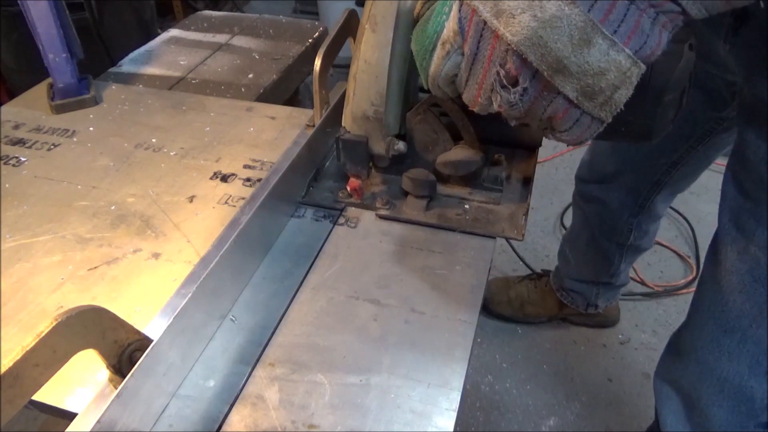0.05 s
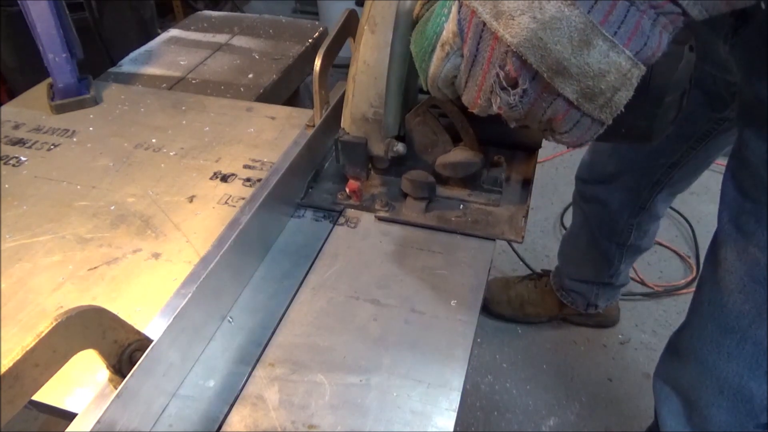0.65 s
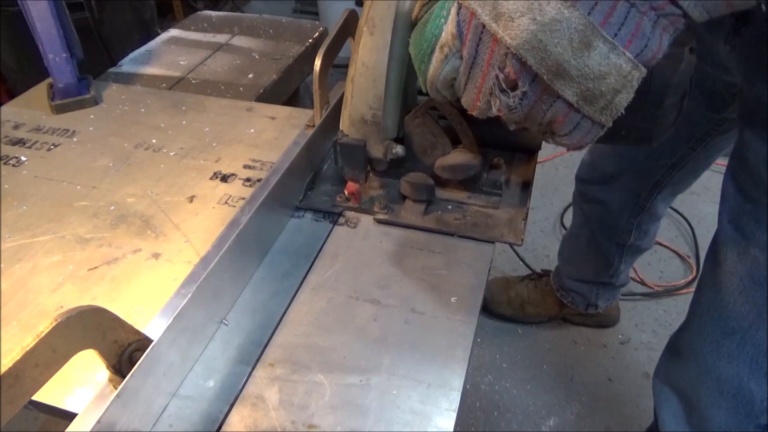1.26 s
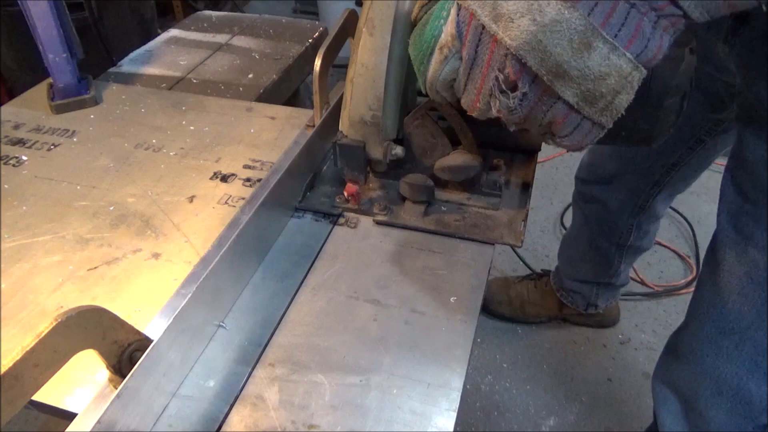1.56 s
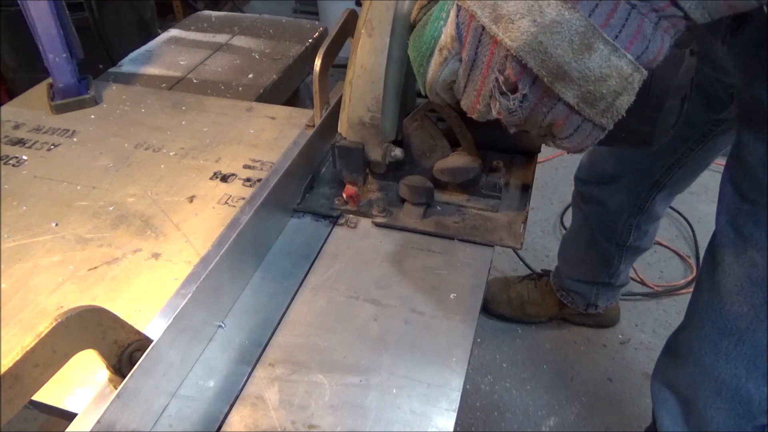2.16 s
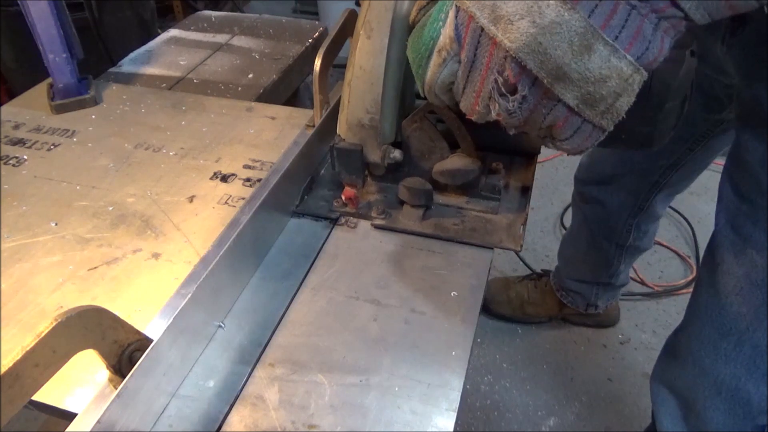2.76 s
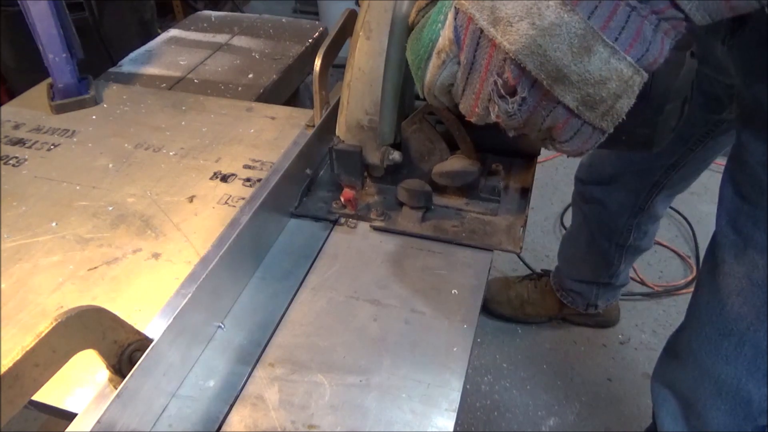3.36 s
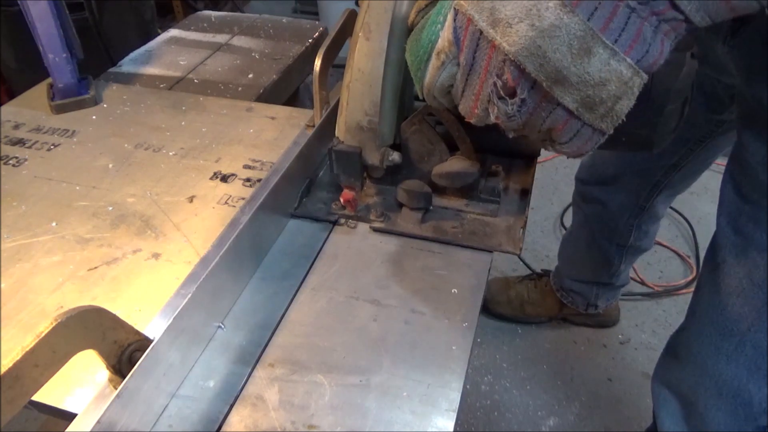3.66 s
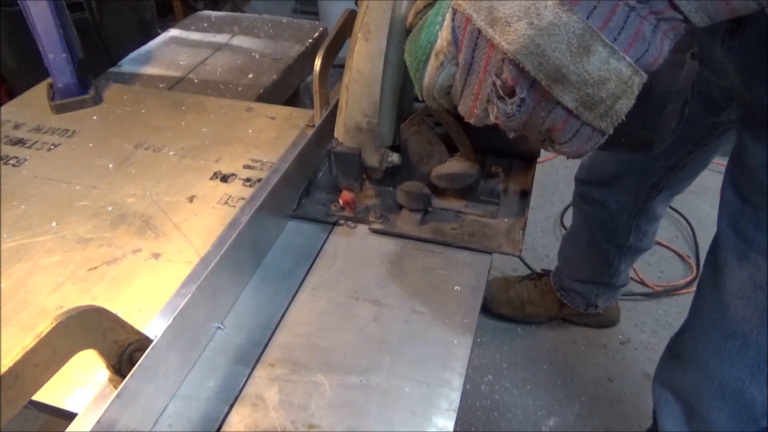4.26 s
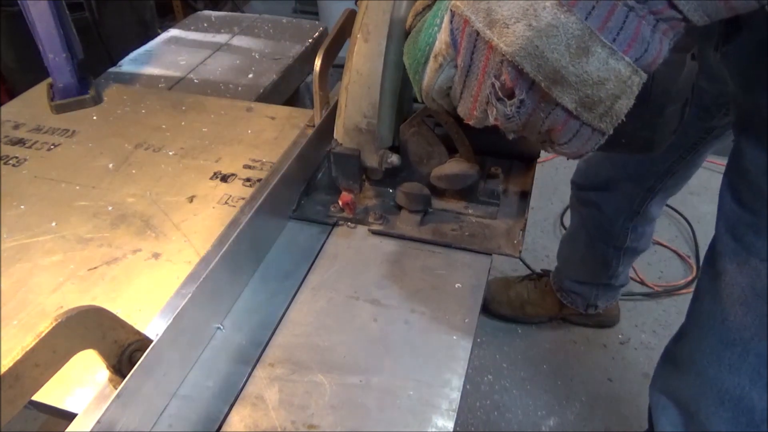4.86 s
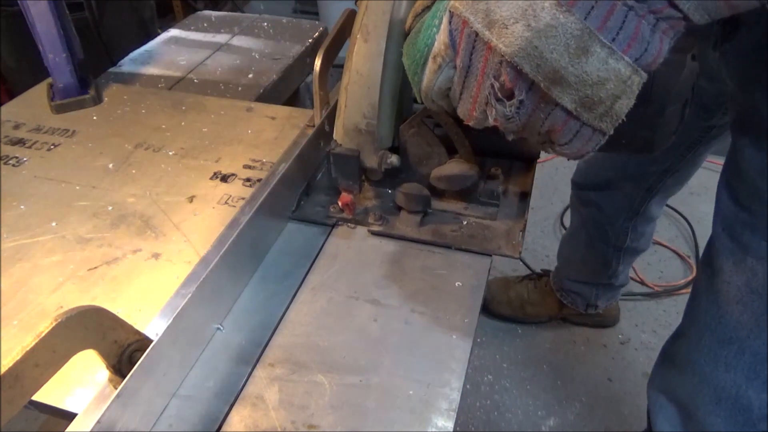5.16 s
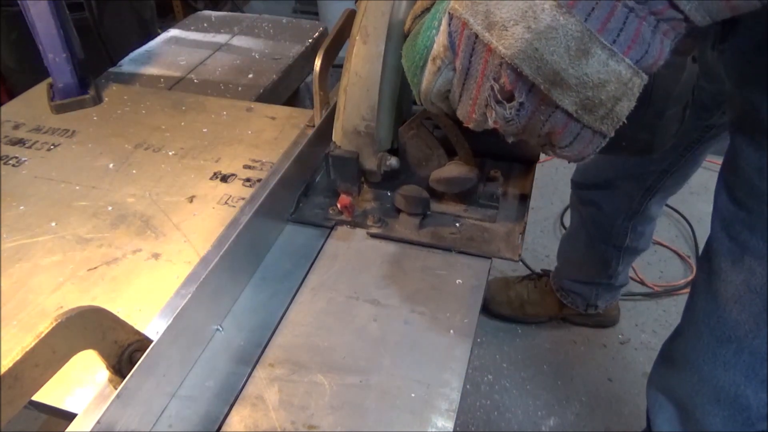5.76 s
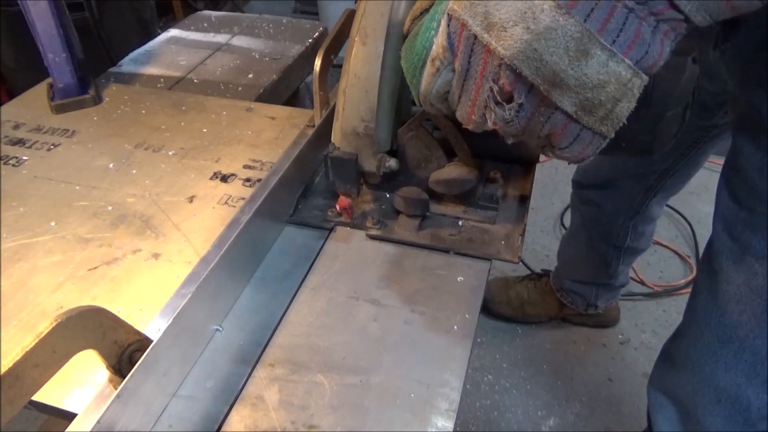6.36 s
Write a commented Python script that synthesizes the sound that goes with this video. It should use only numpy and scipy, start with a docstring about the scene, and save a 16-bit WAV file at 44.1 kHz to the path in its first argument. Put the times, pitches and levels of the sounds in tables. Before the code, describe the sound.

Already deep in a cut, a circular saw screeches without pause through a thick metal plate. The shrill, hissing ring wavers as the pressure changes, with early squeals from the rubbing blade and a low motor whine beneath. Past the middle it eases for a moment, with a dull knock on either side, then bites again. The microphone is near and a little overdriven, in a workshop with very short reflections.

```python
"""A hand-held circular saw cuts along a thick aluminium plate in a workshop.
Carbide teeth tear off chips; the force sets blade, plate and saw body ringing in a dense screech,
with the tooth rate humming below. The hand leans in and eases off a few times. The blade's flank
rubs the kerf: an early squeal gives way to pairs of sharp rings that swell as the blade binds.
Late in the cut, the saw's shoe knocks twice on the plate."""
import sys
import numpy as np
from scipy import signal
from scipy.fft import rfft, irfft, next_fast_len
from scipy.io import wavfile

SR = 44100
rng = np.random.default_rng(int(sys.argv[2]) if len(sys.argv) > 2 else 0)


def wrap_up_sound(samples):
    """Save the sound to the file named by the first command line argument, as 16-bit audio."""
    columns = np.atleast_2d(samples).T
    # keep every value between -1 and 1, then stretch to whole-number steps
    tamed = np.clip(columns, -1, 1)
    steps = np.round(tamed * 32767).astype(np.int16)
    wavfile.write(sys.argv[1], SR, steps)


N = 287532

# Blade speed, sagging under strain. Each row: time in seconds, turns per second.
BLADE_SPEED = [(0, 63.3), (.4, 64.0), (1.0, 63.0), (1.25, 63.0), (1.58, 62.0), (1.8, 63.3), (2.4, 63.5),
               (2.7, 62.9), (3.0, 63.2), (3.3, 63.95), (3.95, 63.45), (4.4, 64.45), (4.8, 63.1),
               (5.25, 64.1), (5.6, 63.8), (6.52, 63.8)]
# The hand leans in (+) or eases off (-). Each row: start and end in seconds, bite of the teeth in dB,
# strain on the saw body in dB. Layers follow these by their own shares.
FEED_CHANGES = [(1.22, 1.44, 0.8, 4.5), (1.54, 1.79, -3, 2), (1.79, 2.31, -1.0, 0), (2.54, 2.63, -2, 1.5),
                (2.66, 2.81, 1.1, 5), (2.85, 2.94, -3.8, 0.5), (3.96, 4.06, -0.5, 0.5),
                (4.43, 4.62, 0.6, -.5), (4.64, 4.91, -5, -1.5), (4.91, 5.13, -.5, -1),
                (5.13, 5.35, -2.5, -1), (5.37, 5.49, 1.6, -2), (5.55, 5.63, -1.4, -1)]
# Resonances of blade, plate and saw body; the narrow lowest body row sits on the drive whine's 19th spindle
# tone rather than a body mode of its own. Each row: pitch in Hz, width in Hz, relative level in dB.
BLADE_MODES = [(5700.0, 77.0, -10.1), (5762.0, 24.0, -10.5), (6098.0, 19.0, -5.5), (6235.0, 41.0, -7.0),
               (6405.0, 27.0, -5.7), (6512.0, 32.0, -3.8), (6606.0, 55.0, -2.1), (6729.0, 24.0, -7.0),
               (6919.0, 37.0, -3.1), (7020.0, 35.0, -3.6), (7106.0, 33.0, -1.2), (7217.0, 17.0, -12.8),
               (7331.0, 45.0, -7.1), (7471.0, 70.0, -1.3), (7610.0, 38.0, -2.3), (7688.0, 39.0, -8.0),
               (7929.0, 174.0, -2.5), (8045.0, 35.0, -5.8), (8600.0, 86.0, -0.9), (8771.0, 56.0, -3.6),
               (9118.0, 99.0, -5.3), (9214.0, 27.0, -6.1), (9358.0, 74.0, 0.0), (9520.0, 29.0, -5.9),
               (9807.0, 25.0, -11.1), (9894.0, 41.0, -10.7), (9974.0, 69.0, -2.0), (10112.0, 31.0, -3.7),
               (10406.0, 29.0, -16.4), (10784.0, 124.0, -6.0)]
PLATE_MODES = [(2233.0, 67.0, -4.9), (2498.0, 40.0, -10.4), (3765, 28, -4), (3903.0, 18.0, -11.7),
               (3983.0, 55.0, 0.0), (4136.0, 29.0, -6.1), (4273.0, 23.0, -10.7), (4474.0, 44.0, -5.6),
               (4536.0, 15.0, -6.8), (4694.0, 46.0, -1.7), (4793.0, 20.0, -3.2), (5350.0, 32.0, -4.3),
               (5443.0, 17.0, -5.5)]
BODY_MODES = [(1206.0, 12.0, -7.8), (1290.0, 28.0, -5.2), (1384.0, 34.0, -3.8), (1421.0, 38.0, 0.0),
              (1586.0, 21.0, -16.8)]
# Colour of the hiss and the low rumble. Each row: frequency in Hz, relative level in dB.
HISS_SPECTRUM = [(700, -27), (1000, -12), (1400, -11), (2200, -11), (3100, -8), (4500, -13.5), (5800, -6.5),
                 (7200, -20), (8400, -10), (10400, -2.5), (11000, -4)]
RUMBLE_SPECTRUM = [(20, -13.5), (40, -10), (70, -7), (150, -0.5), (400, 2), (750, 4), (1100, 3),
                   (2000, -13)]
# Tones locked to the spindle. Each row: multiple of the blade speed, relative level in dB.
TOOTH_ORDERS = [(12, 3.5), (13, -4.5), (9, -8.5)]
DRIVE_ORDERS = [(15, -12.5), (16, -10), (19, -5.5), (20, -14), (22.0, -9), (24, -7), (25, -13)]
# Swells of the tooth hum. Each row: time in seconds, relative level in dB.
TOOTH_HUM_CURVE = [(0, -50), (.25, -38), (.5, -37), (1.0, -47), (1.75, -55), (2.15, -44.5), (2.5, -47),
                   (3.1, -48), (3.22, -34.5), (3.55, -36.5), (3.8, -42), (4.45, -32.5), (4.75, -46),
                   (5.25, -51), (5.7, -35.5), (6.52, -35)]
# Resonances that squeal. Each row: pitch in Hz, width in Hz, relative level in dB.
LOW_SQUEAL_MODES = [(1735, 9.1, -6.5), (1980, 27, 5.5)]
HIGH_SQUEAL_MODES = [(4908, 38, 8), (4980, 18, -1)]
# Squeals. Each row: start and end in seconds, boost of the low squeal in dB, of the high one in dB.
SQUEALS = [(0.06, 0.76, 5.5, 7), (0.80, 1.60, 6, 4.5), (1.95, 2.90, 4, 1), (4.82, 5.17, 3, -5),
           (5.35, 5.57, 4.5, 2)]
# The blade's paired rings. Each row: pitch in Hz, relative starting level in dB,
# change in dB per second, share of the binding swell.
LOWER_PAIRS = [(2358, -40.5, 1.5, 1.3), (2418, -40.5, 1.6, 1.3), (2740, -38.5, 1.8, 1),
               (2803, -38.5, 1.9, 1), (3262, -35, .7, .7), (3311, -36.5, 1.1, .9)]
HIGHEST_PAIR = [(3769, -31.5, -.3, 1), (3823, -35, .6, .7)]
# The blade binds. Each row: start and end in seconds, swell of the lower pairs and the highest in dB.
BINDS = [(1.05, 1.48, 0, 5.5), (2.30, 2.854, -1, 6.5), (3.42, 3.68, 1.5, 5), (4.127, 4.286, 4.5, 4),
         (4.38, 4.604, 1.5, 3), (5.74, 6.053, 3, 7), (6.047, 6.42, 4, 3)]
# The shoe hits the plate. Each row: time in seconds, relative level in dB.
KNOCKS = [(4.439, -24), (5.389, -17)]
# Colour of the workshop's reverb. Each row: frequency in Hz, level against the direct sound in dB.
REVERB_SPECTRUM = [(60, -35), (110, -28), (190, 0), (350, 1.5), (620, 3), (1120, -8), (2010, -6.5),
                   (3610, -8), (6480, -11.5), (11600, -18)]

# Each voice: relative level in dB at steady feed, dB per dB of bite, change in dB per second.
TOP_SCREECH, LOWER_SCREECH = (-15.5, 1.27, 0.062), (-18, 1.08, -0.24)
PLATE_RING, BODY_GROWL = (-19.5, 1, 0.11), (-23.5, 0.23, -0.21)
DRIVE_WHINE, LOW_RUMBLE = (-37, 0.108, 0), (-35, 2.4, .03)
FEED_RAMP_S = 0.056   # time the hand takes to change its pressure


def from_db(db):
    """Decibels to gain."""
    return 10 ** (np.asarray(db) / 20)


def rms_one(x):
    """Scale to an rms of 1."""
    return x / np.sqrt(np.mean(x ** 2) + 1e-20)


def curve(rows):
    """Glide in straight lines through (seconds, value) points."""
    return np.interp(np.arange(N) / SR, *np.transpose(rows))


def gate(start_s, end_s, ramp_s):
    """Fade in, hold at 1 and fade out, the fades centred on start and end."""
    t = np.arange(N) / SR
    return np.clip((t - start_s) / ramp_s + .5, 0, 1) - np.clip((t - end_s) / ramp_s + .5, 0, 1)


def held(rows, ramp_s):
    """Gate each (start, end, values) row; one signal for each value column."""
    return sum(np.outer(values, gate(start, end, ramp_s)) for start, end, *values in rows)


def level(voice, bite_db):
    """A voice's level in dB follows the bite and shifts as the cut advances."""
    steady_db, follows, db_per_s = voice
    return steady_db + follows * bite_db + db_per_s * np.arange(N) / SR


def coloured(x, spectrum):
    """Equalise with a smooth (Hz, dB) curve."""
    hz, db = np.transpose(spectrum)
    size = next_fast_len(N + SR // 2)
    bins = np.maximum(np.fft.rfftfreq(size, 1 / SR), 1)
    gain = from_db(np.interp(np.log(bins), np.log(hz), db))
    return irfft(rfft(x, size) * gain, size)[:N]


def drift(rate_hz):
    """A random wobble of rms 1, mostly slower than the given rate."""
    hop = 40   # samples between random points
    pole = np.exp(-2 * np.pi * rate_hz * hop / SR)
    noise = rng.standard_normal(N // hop + 2002)
    slow = signal.lfilter([1], [1, -2 * pole, pole * pole], noise)[2000:]
    return np.interp(np.arange(N) / hop, np.arange(len(slow)), rms_one(slow))


def ringing(modes, force, friction):
    """Each mode is shaken by its own random share of the force; friction limits its swing. Rms 1."""
    out, run_in = np.zeros(N), SR // 10
    force = np.pad(force, (run_in, 0), "reflect")
    for hz, width_hz, db in modes:
        pole = np.exp((2j * np.pi * hz - np.pi * width_hz) / SR)
        shaking = force * rng.uniform(-1.03, 1, len(force))
        swing = signal.lfilter([1], [1, -pole], shaking)[run_in:]
        energy = np.abs(swing) ** 2
        out += from_db(db) * rms_one(swing.real / np.sqrt(1 + friction * energy / energy.mean()))
    return rms_one(out)


def spindle_tones(turns, orders, waver_db):
    """Wavering tones at multiples of the blade speed."""
    phase = 2 * np.pi * (turns + 0.0026 * drift(6))
    return np.sqrt(2) * sum(from_db(db + waver_db * drift(2.4)) * np.sin(k * phase) for k, db in orders)


def cutting_force(turns, teeth, tooth_depth, runout_depth):
    """Each tooth bites once a turn, deeper on the high side of the blade."""
    bites = np.cos(2 * np.pi * teeth * turns)
    runout = np.cos(2 * np.pi * turns)
    return rms_one(np.exp(tooth_depth * bites + runout_depth * runout))


def screech(force, bite_db, split_hz=7300):
    """Blade and plate ring over the hiss of tearing chips; the blade flutters as the teeth grab."""
    top_db, plate_db = level(TOP_SCREECH, bite_db), level(PLATE_RING, bite_db)
    top = ringing([m for m in BLADE_MODES if m[0] > split_hz], force, friction=0.034)
    lower = ringing([m for m in BLADE_MODES if m[0] <= split_hz], force, friction=.1)
    top *= from_db(top_db - 1.0 + drift(38))
    lower *= from_db(level(LOWER_SCREECH, bite_db) - 0.5 + 1.3645 * drift(29))
    plate = from_db(plate_db - 2.5) * ringing(PLATE_MODES, force, friction=0.02233)
    hiss = rms_one(coloured(force * rng.standard_normal(N), HISS_SPECTRUM))
    return top + lower + plate + from_db((top_db + plate_db) / 2 + 2.5) * hiss


def body_growl(turns, force, bite_db, strain_db):
    """The saw's body rings, shaken once a turn by the blade's run-out."""
    db = level(BODY_GROWL, bite_db) - 1.13 + 0.77 * strain_db + drift(22)
    throb = rms_one(np.exp(0.28 * np.cos(2 * np.pi * turns + 1.73 * drift(5.3))))
    return from_db(db) * throb * ringing(BODY_MODES, force, friction=0.18)


def tooth_hum(turns, bite_db):
    """The passing teeth hum at their strike rate, with a weaker tone on either side."""
    db = curve(TOOTH_HUM_CURVE) - 4.5 + 0.56 * bite_db
    return from_db(db) * spindle_tones(turns, TOOTH_ORDERS, waver_db=2.4)


def drive_whine(turns, bite_db, strain_db):
    """The drive whines in step with the spindle, louder under strain."""
    db = level(DRIVE_WHINE, bite_db) - 0.5 + 1.7 * strain_db
    return from_db(db) * spindle_tones(turns, DRIVE_ORDERS, waver_db=0.5)


def low_rumble(bite_db, strain_db):
    """A low, lumpy rumble that swells and dips with the screech."""
    lumps = from_db(2.5 * drift(43)) * rng.standard_normal(N)
    db = level(LOW_RUMBLE, bite_db) + 0.29 * strain_db
    return from_db(db) * rms_one(coloured(lumps, RUMBLE_SPECTRUM))


def kerf_squeal(force, bite_db):
    """The blade's flank rubs the kerf; a low and a high squeal rise out of a steady murmur."""
    low_db, high_db = held(SQUEALS, ramp_s=0.093)
    low = from_db(-31 + low_db + 0.44 * bite_db) * ringing(LOW_SQUEAL_MODES, force, friction=0.16)
    high = from_db(-32.5 + high_db + 1.1 * bite_db) * ringing(HIGH_SQUEAL_MODES, force, friction=0.16)
    return low + high


def paired_rings(bite_db, trim_db=-4.5, waver_db=4.0):
    """Friction keeps the disc singing; waves running with and against the spin split each mode in two."""
    out, t = np.zeros(N), np.arange(N) / SR
    for modes, bind_db in zip((LOWER_PAIRS, HIGHEST_PAIR), held(BINDS, ramp_s=0.0828)):
        for hz, db, db_per_s, share in modes:
            ring_db = level((db + trim_db, 0.45, db_per_s), bite_db) + share * bind_db
            wander = 1.1 * drift(5) + .15 * drift(40)
            tone = np.sqrt(2) * np.sin(2 * np.pi * hz * t + wander)
            out += from_db(ring_db + waver_db * drift(15.3)) * tone
    return out


def shoe_knocks(contact_hz, rebound_hz):
    """The shoe hits the plate: one blunt push, about a millisecond long, with a low rebound."""
    clicks = np.zeros(N)
    for at_s, db in KNOCKS:
        clicks[round((at_s + .001) * SR)] = from_db(db + 8.5) * SR / (np.pi * contact_hz)
    push = signal.sosfilt(signal.butter(2, contact_hz, fs=SR, output="sos"), clicks + 1e-18)
    return signal.sosfilt(signal.butter(2, rebound_hz, "high", fs=SR, output="sos"), push)


def light_run(start_s, end_s, whine_hz=889, sag_hz_per_s=40, hum_hz=384):
    """A thin, sagging whine and a low hum sound while the blade runs lightly."""
    t = np.arange(N) / SR
    whine = np.sin(2 * np.pi * np.cumsum(whine_hz - sag_hz_per_s * (t - start_s)) / SR)
    hum = from_db(-4.5) * np.sin(2 * np.pi * hum_hz * t)
    envelope = gate(start_s, end_s, FEED_RAMP_S) * from_db(-46.5 + 2.7 * drift(8.9))
    return envelope * np.sqrt(2) * (whine + hum)


def workshop(x, t60_s):
    """Reflections from walls and floor, in opposite polarity left and right, widen the sound."""
    t = np.arange(SR // 2) / SR
    tail = rng.standard_normal(len(t)) * from_db(-60 * t / t60_s) * (t > .002)
    padded = np.pad(x, (len(t), 0), "reflect")
    echoes = signal.fftconvolve(padded, tail / np.linalg.norm(tail))[len(t):len(t) + N]
    return x + coloured(echoes, REVERB_SPECTRUM) * np.array([[1], [-1]])


def scene():
    """Blade speed times the teeth; their bite rides the levels of the cut."""
    turns = np.cumsum(curve(BLADE_SPEED)) / SR
    bite_db, strain_db = held(FEED_CHANGES, FEED_RAMP_S)
    bite_db += .35 * drift(17)   # the hand is never quite steady
    force = cutting_force(turns, teeth=12, tooth_depth=0.23, runout_depth=.05)
    saw = screech(force, bite_db) + body_growl(turns, force, bite_db, strain_db)
    saw += tooth_hum(turns, bite_db) + drive_whine(turns, bite_db, strain_db)
    saw += low_rumble(bite_db, strain_db)
    saw += kerf_squeal(force, bite_db) + paired_rings(bite_db)
    knocks = shoe_knocks(contact_hz=545.3, rebound_hz=16.85)
    saw += light_run(start_s=4.64, end_s=5.32)
    balance = from_db([[.1], [-.1]])
    return balance * workshop(saw, t60_s=0.097) + knocks


def record(dry):
    """The screech overloads the microphone, which rounds the peaks; deep bass and the top are cut."""
    ceiling, low_cut_hz, high_cut_hz = .64, 40, 11030
    driven = from_db(2.0) * dry
    rounded = driven / (1 + (driven / ceiling) ** 4) ** .25
    thinned = signal.sosfilt(signal.butter(1, low_cut_hz, "high", fs=SR, output="sos"), rounded)
    low_pass = signal.firwin(1201, high_cut_hz, fs=SR, window=("kaiser", 9))
    return signal.fftconvolve(thinned, low_pass[None], "same", axes=1)


dry = scene()
out = record(dry)
wrap_up_sound(out)
```